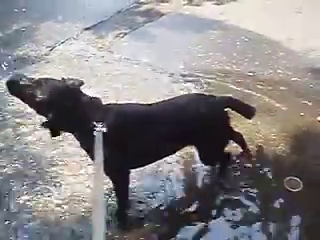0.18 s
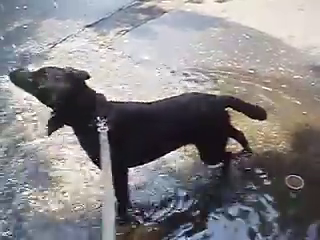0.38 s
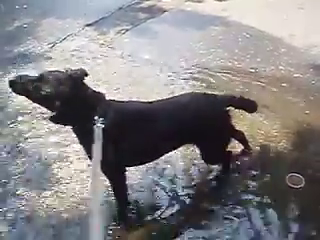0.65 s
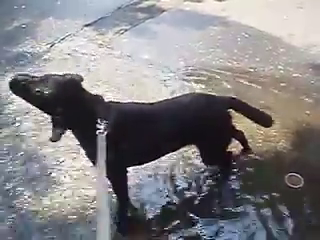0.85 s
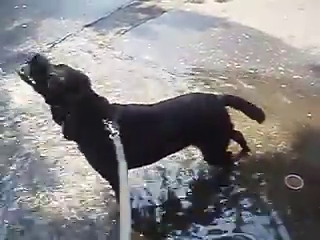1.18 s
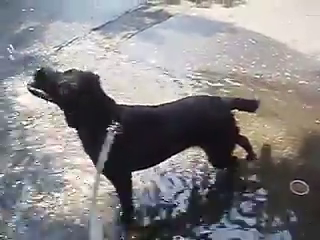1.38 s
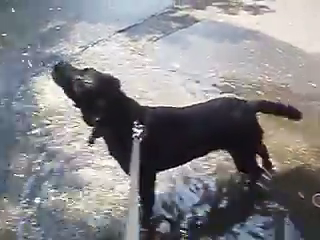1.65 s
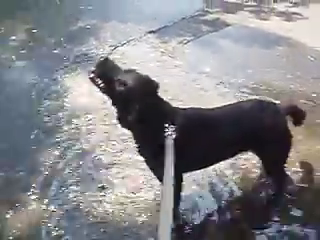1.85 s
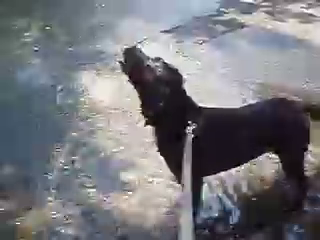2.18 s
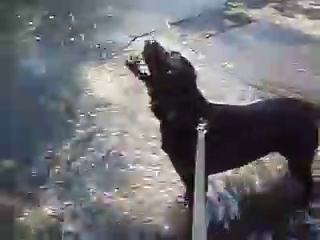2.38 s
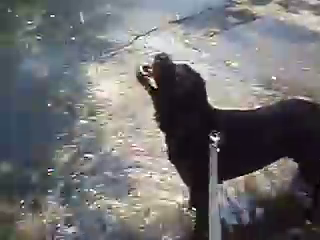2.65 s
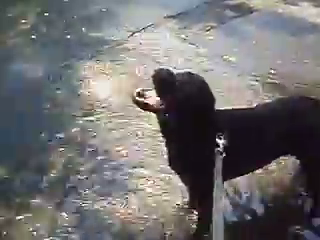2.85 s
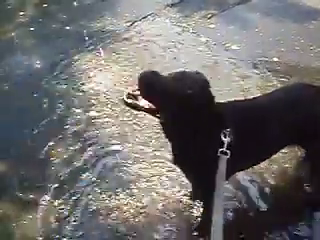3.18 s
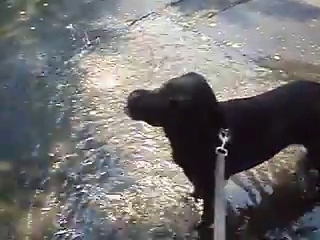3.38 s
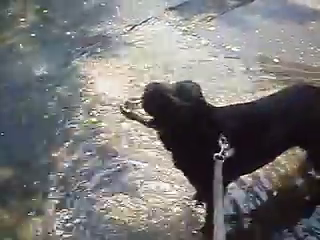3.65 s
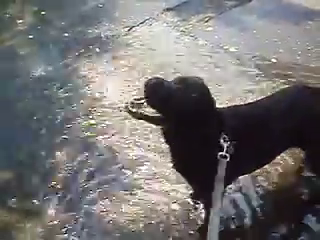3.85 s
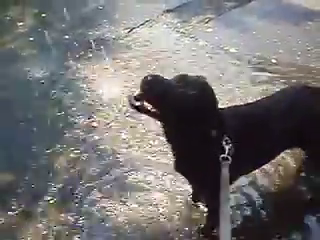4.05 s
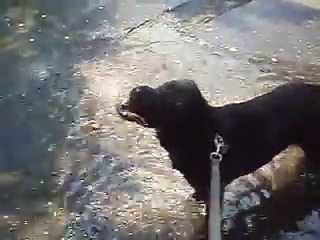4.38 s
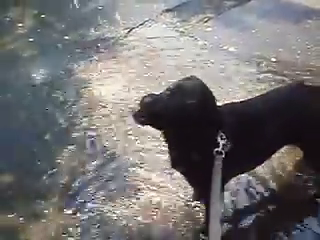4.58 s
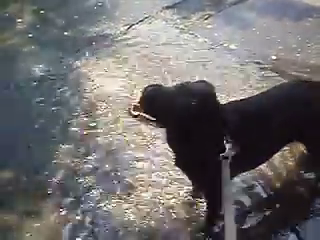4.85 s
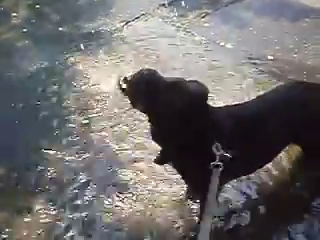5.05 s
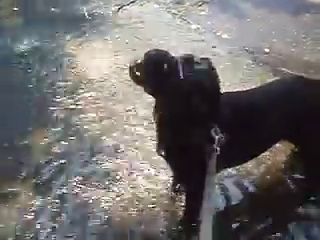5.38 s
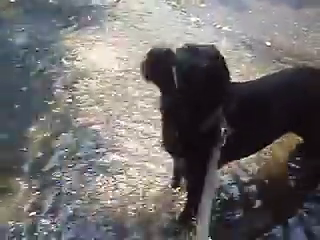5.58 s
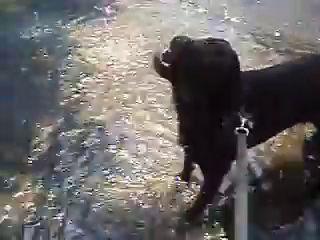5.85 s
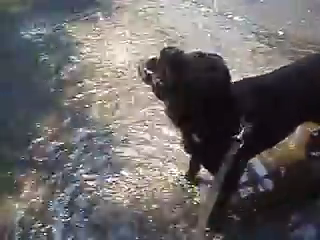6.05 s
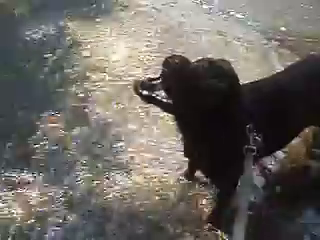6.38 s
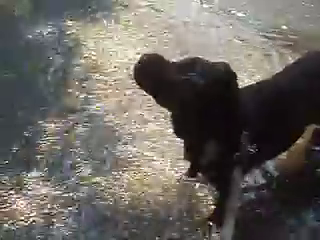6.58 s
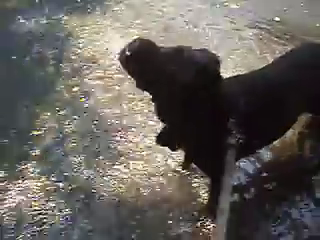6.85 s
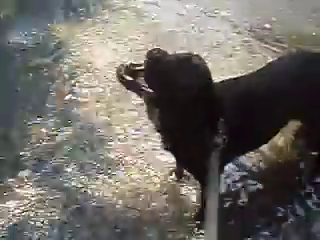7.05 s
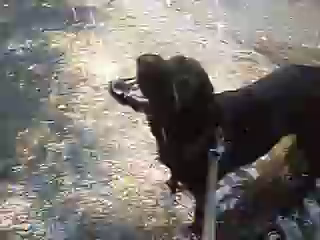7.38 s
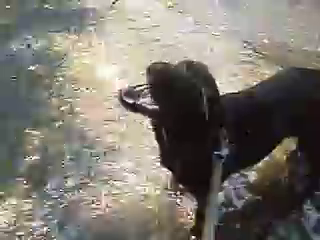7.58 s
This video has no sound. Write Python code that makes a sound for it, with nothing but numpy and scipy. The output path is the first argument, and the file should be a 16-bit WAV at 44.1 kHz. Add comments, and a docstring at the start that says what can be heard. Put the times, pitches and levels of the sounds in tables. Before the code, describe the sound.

A dense, constant hiss of splashing water, pricked by snapping drops and a few puddle plops, over a low humming roar, slightly overloaded.

```python
"""A dense, bright hiss of water jets splattering onto wet pavement, pricked by single ticking drops.
Spray is shaped noise, random clicks and short ringing bubbles; near drops snap, then ring as a bubble.
Deeper plops sound in the puddle. Beneath lie a broad low roar of shaped noise, a few wavering hums
of tone and narrow noise, and faint whines. The recorder cuts the top steeply and then overloads."""
import sys
import numpy as np
from scipy import signal
from scipy.fft import rfft, irfft
from scipy.io import wavfile

SR = 44100
rng = np.random.default_rng(int(sys.argv[2]) if len(sys.argv) > 2 else 0)


def gain_from_db(level_db):
    """Convert decibel levels to linear amplitude factors (20 dB per decade)."""
    decades = np.asarray(level_db, float) / 20
    return 10 ** decades


def log_audio(samples):
    """Write samples as a 16-bit WAV file to the path given in sys.argv[1]."""
    # one column per channel
    frames = np.atleast_2d(samples).T
    # limit to full scale, then quantise
    limited = np.clip(frames, -1, 1)
    pcm = np.round(limited * 32767).astype(np.int16)
    wavfile.write(sys.argv[1], SR, pcm)


N = 340452      # samples, about 7.7 s

# All levels are those ahead of the recorder.
# Colour of the spray, scaled later to its own loudness: pitch_hz, relative level_db (per Hz)
SPRAY_SPECTRUM = [(300, -40.5), (800, -17.5), (1400, -15.5), (2060, -13), (2400, -8), (2900, -8),
                  (3500, -3.5), (3900, -2), (4300, 5), (4700, -10.5), (6000, -52.5)]
# Single drops at set times, loud and soft: start_s, bubble peak level_db, bubble pitch_hz
SINGLE_DROPS = [(0.2274, -3, 3470), (0.2835, -11, 3560), (0.3275, -13.5, 3840), (0.3586, -11, 3530),
                (0.4177, -13, 3450), (0.6697, -4, 3640), (0.7248, -8, 2240), (1.3389, -3.5, 2674),
                (1.4067, -6, 3370), (1.6537, -1.5, 3370), (1.7548, -0.5, 3800), (1.7757, -5, 3660),
                (1.8487, -9, 3450), (1.8835, -8, 3690), (1.8976, -1.5, 3390), (2.2169, -2, 2960),
                (2.4329, -5.5, 2700), (2.633, -4.5, 3180), (2.7222, -8, 3260), (2.9695, -6, 3240),
                (3.1542, -13, 3830), (3.258, -1, 3350), (3.3895, -11, 3160), (3.5548, -3.5, 3640),
                (3.6389, -4, 3420), (3.7875, -7, 3300), (4.1394, -1.5, 3400), (4.2747, -8, 3670),
                (4.6653, -4, 3430), (5.003, -2.5, 3540), (5.1601, -4, 3540), (5.2035, -4.5, 3600),
                (5.2626, 0, 3430), (5.5357, -7, 3190), (5.7798, -6, 3170), (5.9404, 1, 3500),
                (5.9706, -6.5, 3260), (6.0116, -3, 2370), (6.5266, -3.5, 3300), (6.7968, -6, 3520),
                (6.8405, -6, 2830), (6.8633, -1.5, 3320), (7.271, 2, 3230), (7.5003, -2.5, 3500),
                (7.665, -5, 3520)]
# Deeper plops in the puddle: start_s, bubble peak level_db, bubble pitch_hz
PUDDLE_PLOPS = [(0.204, -11, 1130), (0.331, -17, 1690), (0.682, -12, 1560), (2.31, -14, 1700),
                (2.353, -8, 1136), (3.043, -10.5, 1470), (3.117, -14.5, 1830), (3.395, -12, 2000),
                (4.49, -12, 1206), (6.221, -10.5, 1660), (6.392, -16, 1350), (6.461, -14, 1250),
                (6.86, -14.5, 1200), (7.525, -8.5, 1910)]
# Colour of the roar, scaled later to its own loudness: pitch_hz, relative level_db (per Hz)
ROAR_SPECTRUM = [(18, -40.5), (24, -26), (33, -18), (50, -8), (62, -4.5), (90, -6.5), (140, -7.5),
                 (250, -7.5), (450, -16.5), (600, -17), (800, -22), (1300, -24.5), (2500, -28.5)]
# Lift of the upper roar, around 250-450 Hz: start_s, gain_db
UPPER_ROAR_LIFT = [(0.0, 2), (2.0, 2.5), (3.6, -1.0), (5.5, 0.0), (6.6, 0), (7.72, 0)]
# Wavering hums: pitch_hz, width_hz, share of power in the tone (0-1), mean level_db (rms, before
# the swap below), rms waver_db (its sign only flips the random curve)
HUMS = [(70.2, 5.16, 0.5, -20.5, 0.3), (110.9, 10.04, 0.33, -23.5, -1), (153.6, 6.12, 0.3, -24.5, 2.5),
        (173, 4.955, 0.75, -24, 1), (217.1, 3.985, 0.72, -22.5, 1.1)]
# The lowest hum fades and recovers; the highest sinks, comes forward and sinks again:
# start_s, lowest hum gain_db, highest hum gain_db
HUM_SWAP = [(0.0, 1.5, 2), (1.5, 1.5, -6), (4.4, -2.5, -4), (4.7, -2.5, 1.5), (6.6, -3, 3.5), (7.72, 0, -2)]
# Faint steady tones: pitch_hz, level_db (rms)
WHINES = [(1191, -46), (1950, -43)]


def rms_one(x):
    """Scales a signal to an rms of 1."""
    return x / np.sqrt(np.mean(x ** 2) + 1e-20)


def in_time(rows):
    """Draws each column of a curve table as one value per sample."""
    start_s, *columns = np.transpose(rows)
    t = np.arange(N) / SR
    return [np.interp(t, start_s, column) for column in columns]


def coloured(x, spectrum):
    """Filters x to a spectrum with minimum phase, so nothing sounds early; the result has rms 1."""
    size = 2 ** 13
    hz, db = np.transpose(spectrum)
    grid_hz = np.arange(size // 2 + 1) * SR / size
    log_gain = np.interp(np.log(grid_hz + 1), np.log(hz), db) * np.log(10) / 20
    # folding the cepstrum onto positive times makes the filter causal
    cepstrum = irfft(log_gain)
    cepstrum[1:size // 2] *= 2
    cepstrum[size // 2 + 1:] = 0
    impulse = irfft(np.exp(rfft(cepstrum)))
    return rms_one(signal.fftconvolve(x, impulse)[:N])


def drift(rate_hz):
    """Wanders at random with rms 1: noise through two equal one-pole low-passes."""
    r = np.exp(-2 * np.pi * rate_hz / SR)
    noise = rng.standard_normal(N + SR)
    return rms_one(signal.lfilter([1], [1, -2 * r, r * r], noise)[SR:])     # drops the first second


def ring(clicks, hz, t60_s):
    """A resonator: a unit click starts a decaying sine of initial height 1."""
    r = gain_from_db(-60 / (t60_s * SR))
    w = 2 * np.pi * hz / SR
    return signal.lfilter([0, np.sin(w)], [1, -2 * r * np.cos(w), r * r], clicks + 1e-18)


def arrivals(per_s, spread_db):
    """Random clicks of either sign, like drops landing; a few are much bigger than the rest."""
    born = rng.random(N) < per_s / SR
    sizes = gain_from_db(spread_db * np.minimum(rng.exponential(1, N), 4.5))
    return born * sizes * rng.choice([-1, 1], N)


def splatter():
    """Far drops merge into hiss, near ones tick, and some trap a bubble that rings a few cycles."""
    clumps = gain_from_db(1.7 * drift(30))      # the jets break up into bunches of drops
    hiss = rng.standard_normal(N) * gain_from_db(1.1 * drift(31))
    ticks = rms_one(arrivals(900 * clumps, spread_db=5.5))
    born = arrivals(700 * clumps, spread_db=2.0)
    pitches_hz = np.geomspace(700, 4300, 18)
    dealt = rng.integers(0, len(pitches_hz), N)      # which pitch each bubble gets
    bubbles = np.zeros(N)
    for k, hz in enumerate(pitches_hz):
        # short high rings in wide bands need more height for an even spectrum
        bubbles += hz * ring(born * (dealt == k), hz, t60_s=24.0 / hz)
    mix = gain_from_db(-9.0) * hiss + gain_from_db(-4.5) * ticks + gain_from_db(-13.5) * rms_one(bubbles)
    return coloured(mix, SPRAY_SPECTRUM)


def spray():
    """The steady flow of splatter, its loudness wavering slightly."""
    level_db, waver_db = -16, 0.1
    return gain_from_db(level_db + waver_db * drift(4.4)) * splatter()


def drops(events, cycles, glide, tick_db):
    """A sharp impact, then a bubble swells within a few cycles and dies while its pitch slides.

    cycles: time to decay by 60 dB; glide: relative slide, positive rises;
    tick_db: impact click over bubble peak, before the click is band-passed.
    """
    bubbles, impacts = np.zeros(N + SR), np.zeros(N)
    for (start_s, level_db, hz), turn in zip(events, rng.random(len(events))):
        n = np.arange(int(1.5 * cycles / hz * SR)) * hz / SR      # time in cycles
        shape = (1 - np.exp(-n / 2.2)) * gain_from_db(-60 * n / cycles)
        phase = turn + n * (1 - glide / 2) + glide * n ** 2 / cycles
        wave = np.sin(2 * np.pi * phase)
        at = round(start_s * SR)
        bubbles[at:at + len(n)] += gain_from_db(level_db) * shape / shape.max() * wave
        impacts[at] = gain_from_db(level_db + tick_db)
    snap = signal.butter(2, [1900, 4200], "band", fs=SR, output="sos")
    return bubbles[:N] + signal.sosfilt(snap, impacts + 1e-18)


def near_drops(count):
    """Deals drops at random moments; small high bubbles are the most common."""
    weak_db, strong_db = -14.0, -8      # bubble peaks
    top_hz, fall_hz, floor_hz = 3900, 348, 2600      # fall_hz: mean fall below the top, before the floor
    when, size, depth = rng.random((count, 3)).T
    start_s = when * (N - 1) / SR
    level_db = weak_db + (strong_db - weak_db) * size
    pitch_hz = np.maximum(top_hz + fall_hz * np.log(depth + 1e-9), floor_hz)
    return list(zip(start_s, level_db, pitch_hz))


def low_roar():
    """Broad low noise whose upper part swells and sinks over the steady bottom."""
    lift_db, = in_time(UPPER_ROAR_LIFT)
    body = gain_from_db(-14.0) * coloured(rng.standard_normal(N), ROAR_SPECTRUM)
    upper_band = signal.butter(2, [250, 450], "band", fs=SR, output="sos")
    upper = signal.sosfilt(upper_band, body)
    return body + (gain_from_db(lift_db) - 1) * upper


def hums():
    """Each hum is a tone of wandering pitch inside a narrow band of noise."""
    out = np.zeros(N)
    lowest_db, highest_db = in_time(HUM_SWAP)
    swaps_db = [lowest_db, 0, 0, 0, highest_db]
    for (hz, width_hz, steady, level_db, waver_db), swap_db in zip(HUMS, swaps_db):
        pitch_hz = hz + 0.3013 * width_hz * drift(1.51)
        tone = np.sqrt(2) * np.sin(2 * np.pi * np.cumsum(pitch_hz) / SR)
        t60_s = np.log(1000) / (np.pi * width_hz)      # a narrower band rings longer
        band = rms_one(ring(rng.standard_normal(N + SR), hz, t60_s)[SR:])
        blend = np.sqrt(steady) * tone + np.sqrt(1 - steady) * band
        out += gain_from_db(level_db + swap_db + waver_db * drift(1.5)) * blend
    return out


def whines():
    """Thin high sine tones, barely out of the hiss."""
    t = np.arange(N) / SR
    return sum(np.sqrt(2) * gain_from_db(db) * np.sin(2 * np.pi * hz * t) for hz, db in WHINES)


def scene():
    """Spray, single drops, roar, hums and whines at one microphone."""
    single = drops(list(SINGLE_DROPS) + near_drops(count=90), cycles=18.0, glide=0.015, tick_db=18.5)
    plops = drops(PUDDLE_PLOPS, cycles=22.0, glide=-0.19, tick_db=0.0)
    return (spray() + single + plops + low_roar() + hums() + whines())[None]


def band_limit(x):
    """A steep low-pass at the top of the band."""
    return signal.sosfilt(signal.butter(12, 15900, fs=SR, output="sos"), x)


def record(dry):
    """The preamp rounds peaks, a steep low-pass cuts the top, then overload flattens what is too loud.

    Every flattened peak spits a click into the empty treble.
    """
    preamp_top, knee_top, overload = 0.92, .735, .707      # peak amplitudes
    squeezed = dry / (1 + np.abs(dry / preamp_top) ** 4) ** .25
    # run both ways for zero phase; 4916 Hz is the stopband edge, 45 dB down on each pass
    low_pass = signal.cheby2(8, 45, 4916, fs=SR, output="sos")
    narrow = signal.sosfiltfilt(low_pass, squeezed)
    bent = narrow / (1 + np.abs(narrow / knee_top) ** 16) ** (1 / 16)      # a tight knee
    return band_limit(np.clip(bent, -overload, overload))


dry = scene()
out = record(dry)
log_audio(out)
```